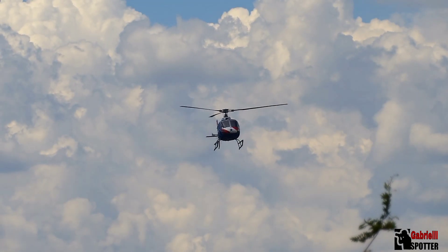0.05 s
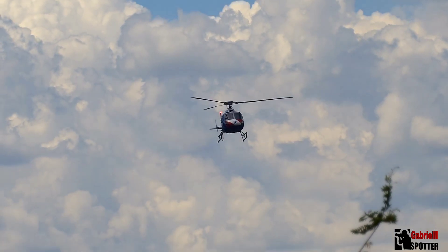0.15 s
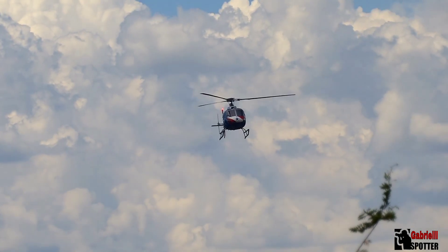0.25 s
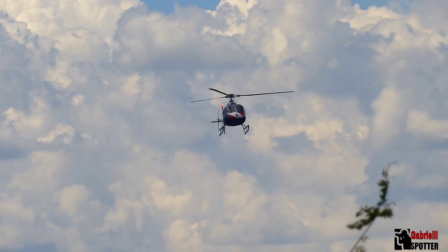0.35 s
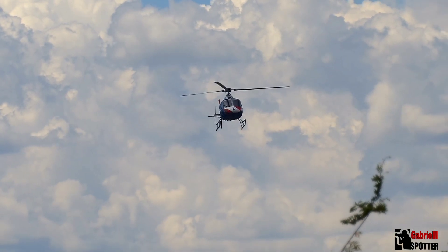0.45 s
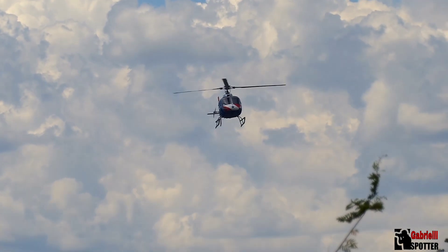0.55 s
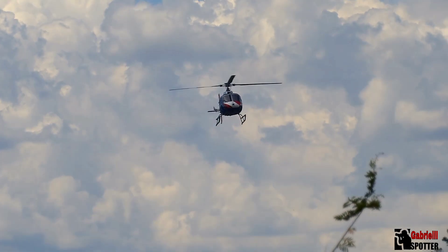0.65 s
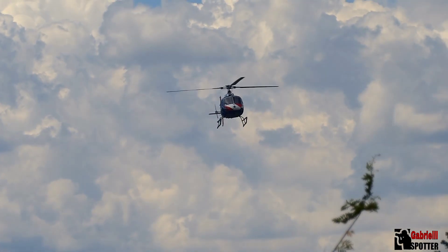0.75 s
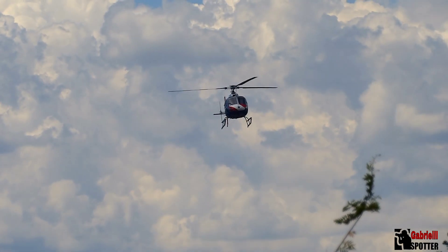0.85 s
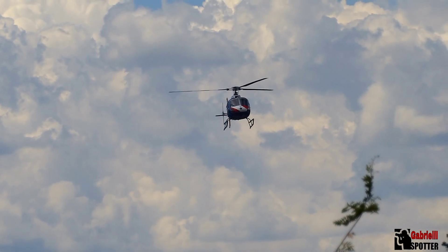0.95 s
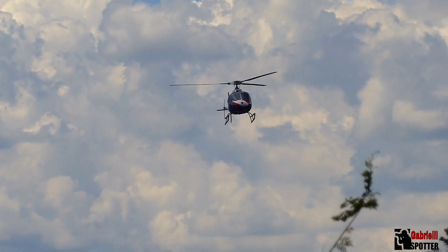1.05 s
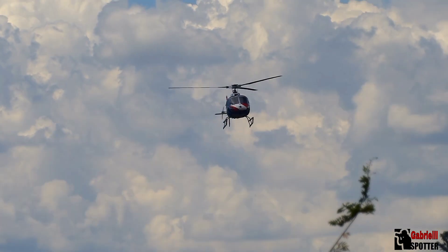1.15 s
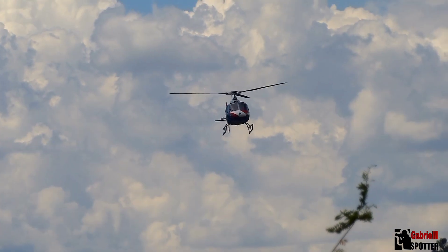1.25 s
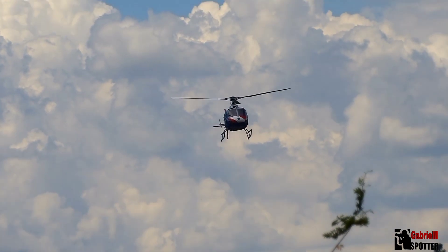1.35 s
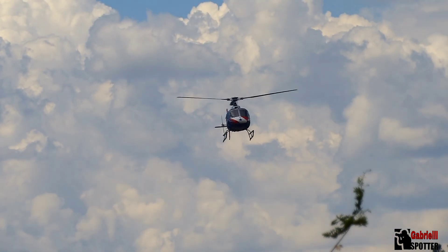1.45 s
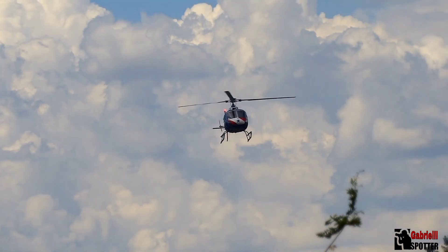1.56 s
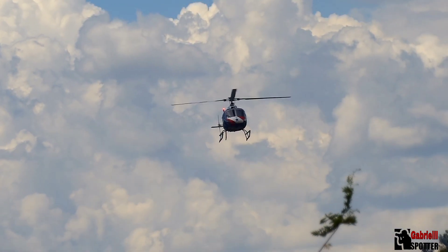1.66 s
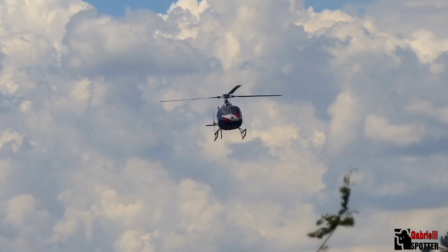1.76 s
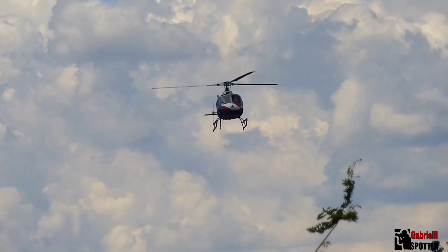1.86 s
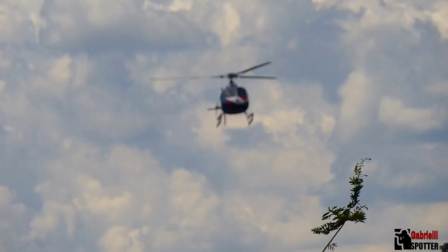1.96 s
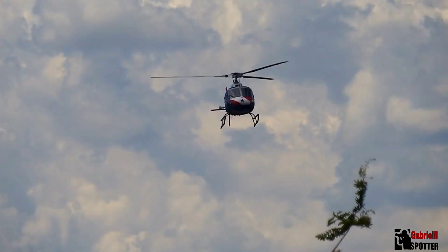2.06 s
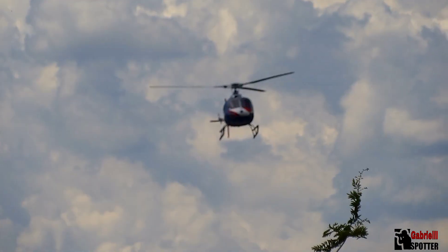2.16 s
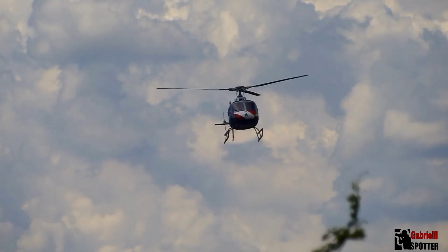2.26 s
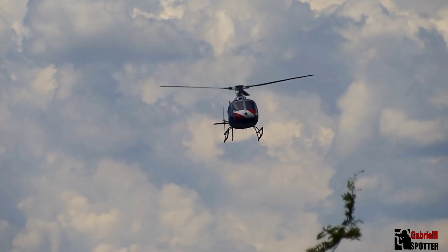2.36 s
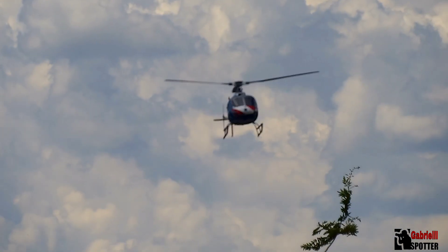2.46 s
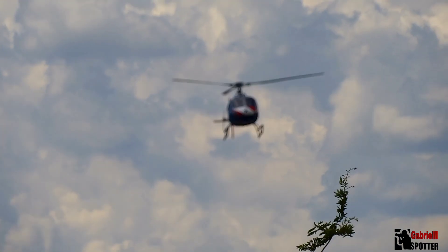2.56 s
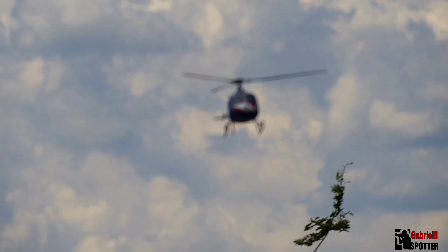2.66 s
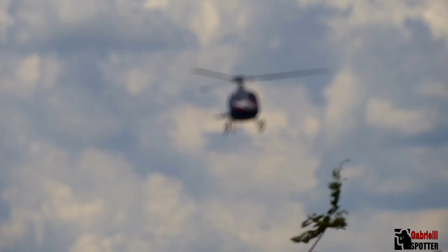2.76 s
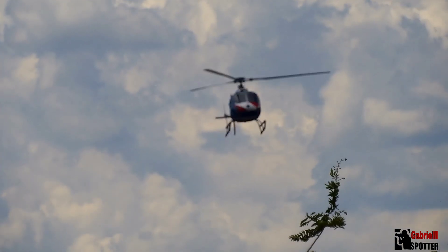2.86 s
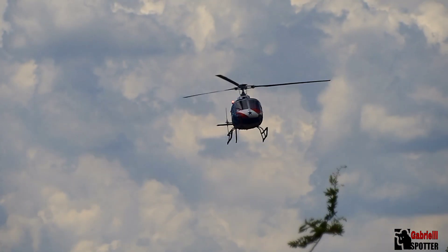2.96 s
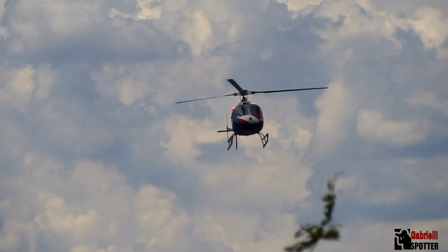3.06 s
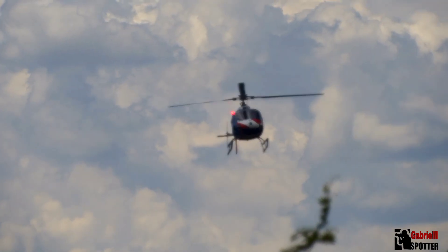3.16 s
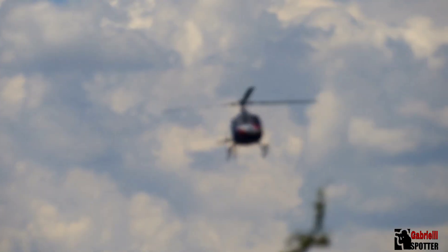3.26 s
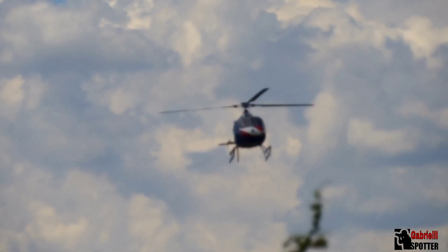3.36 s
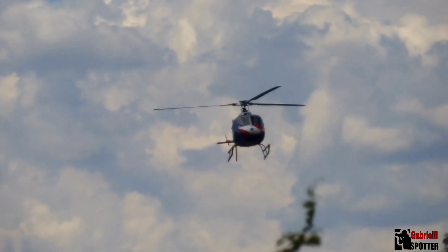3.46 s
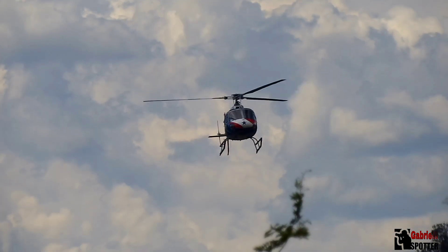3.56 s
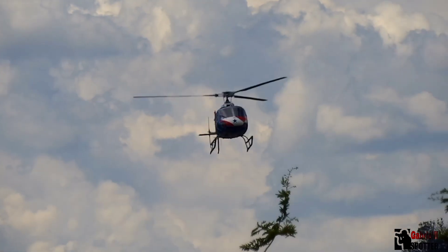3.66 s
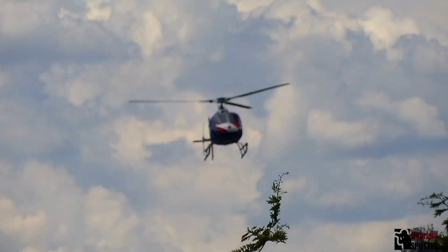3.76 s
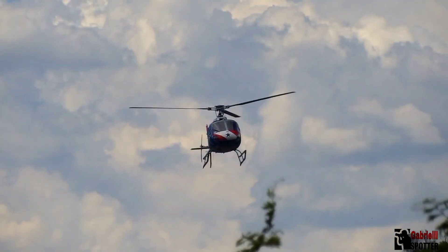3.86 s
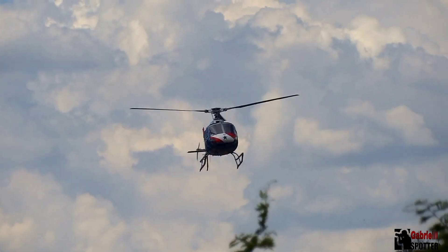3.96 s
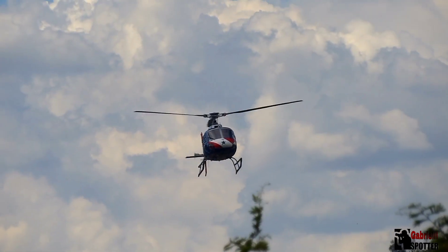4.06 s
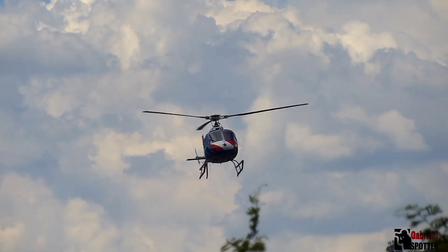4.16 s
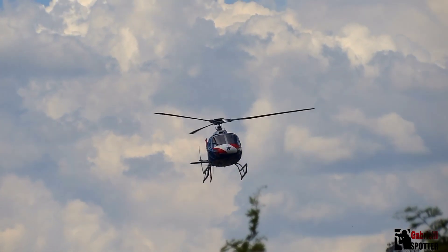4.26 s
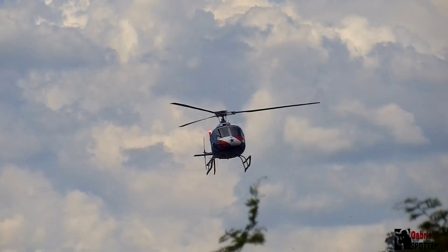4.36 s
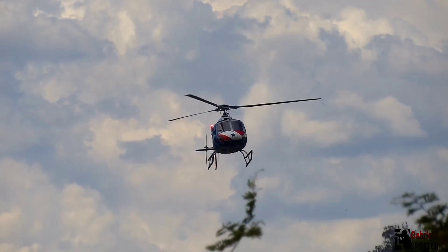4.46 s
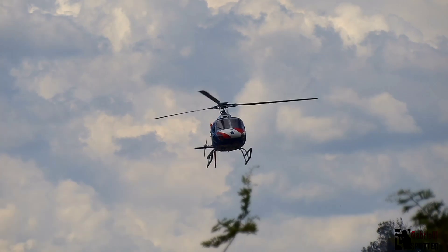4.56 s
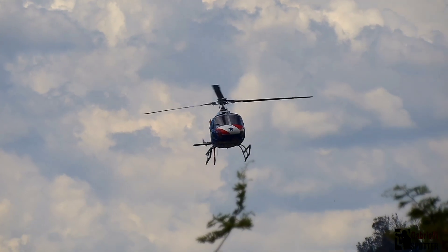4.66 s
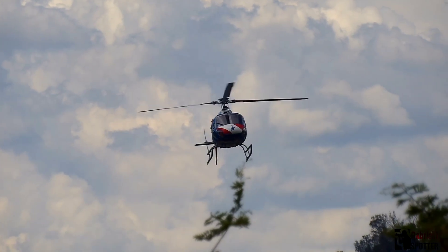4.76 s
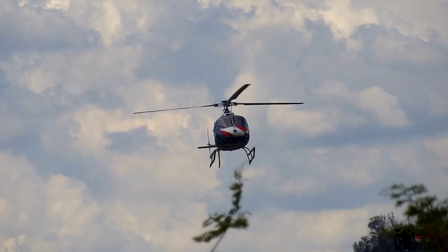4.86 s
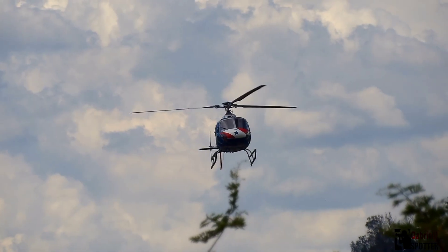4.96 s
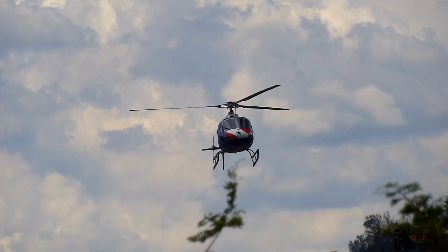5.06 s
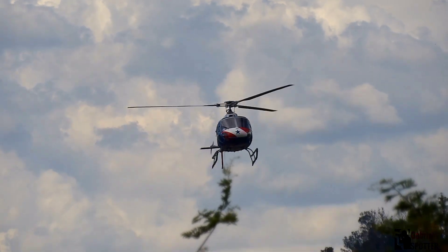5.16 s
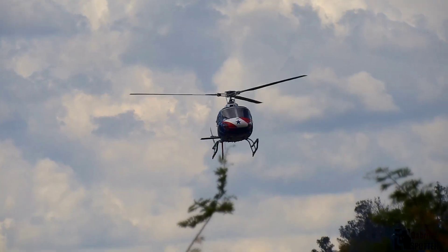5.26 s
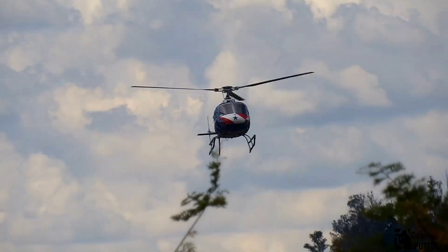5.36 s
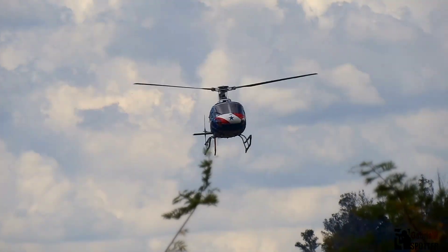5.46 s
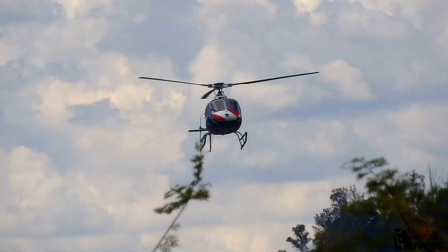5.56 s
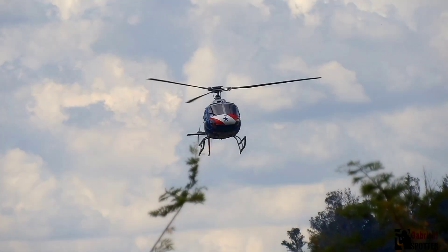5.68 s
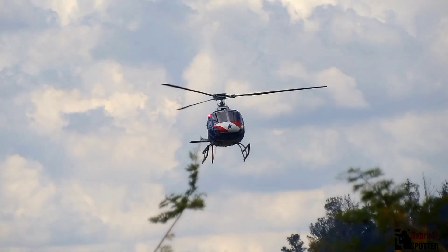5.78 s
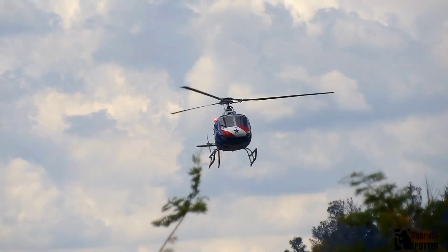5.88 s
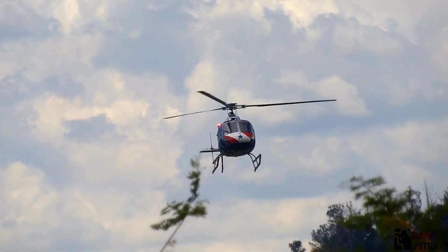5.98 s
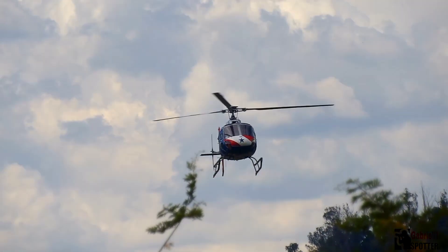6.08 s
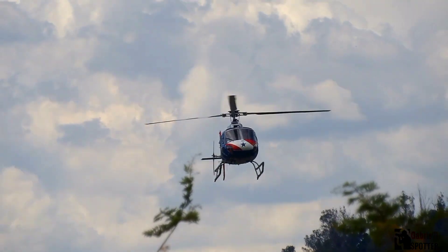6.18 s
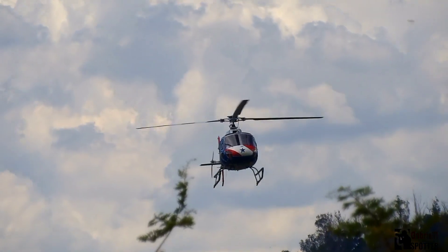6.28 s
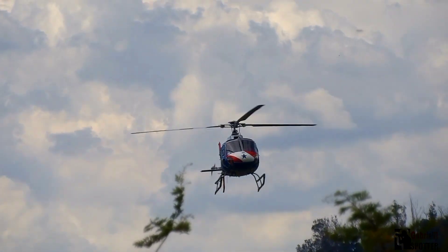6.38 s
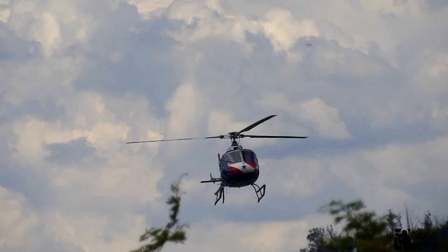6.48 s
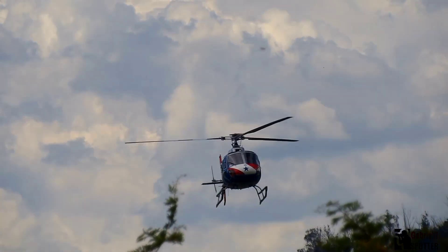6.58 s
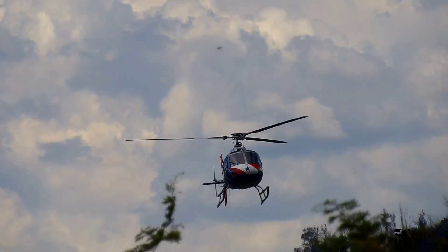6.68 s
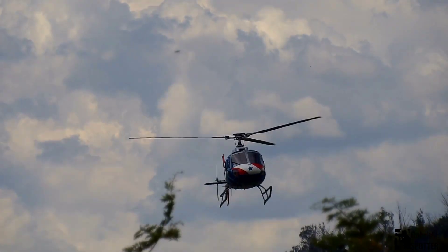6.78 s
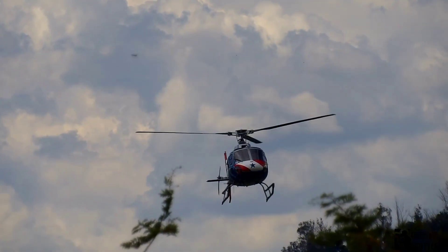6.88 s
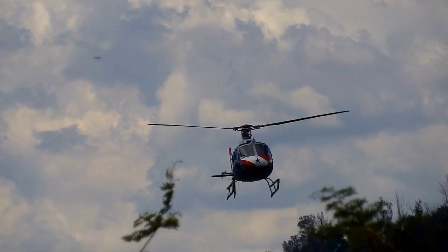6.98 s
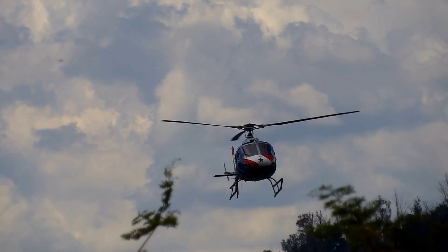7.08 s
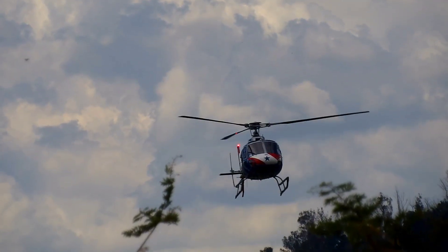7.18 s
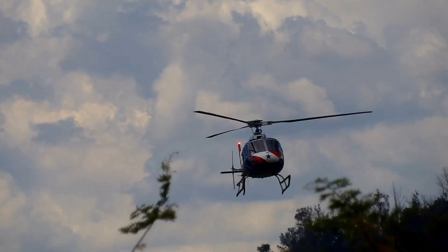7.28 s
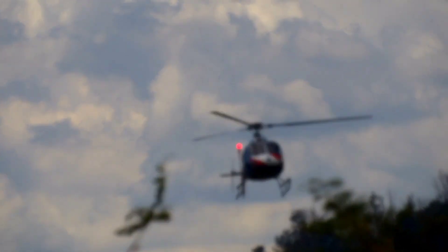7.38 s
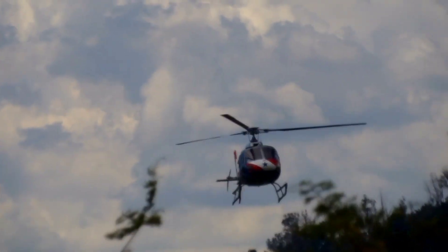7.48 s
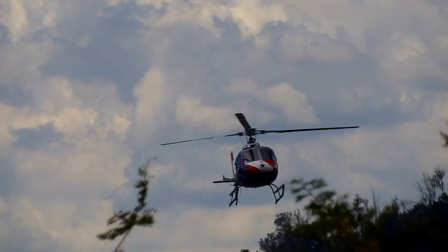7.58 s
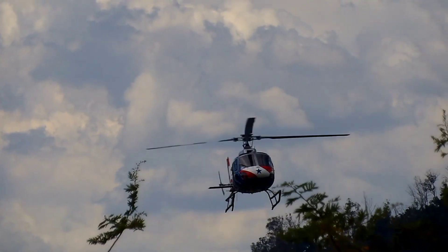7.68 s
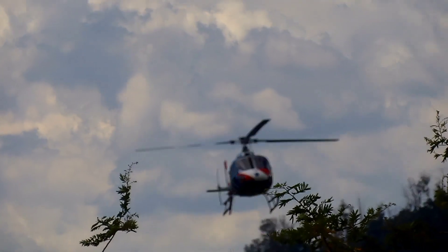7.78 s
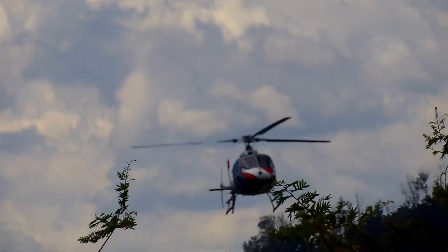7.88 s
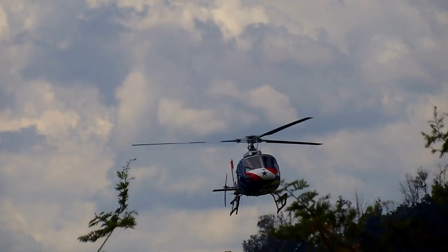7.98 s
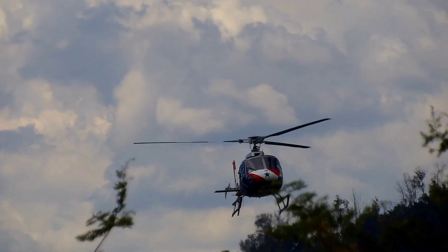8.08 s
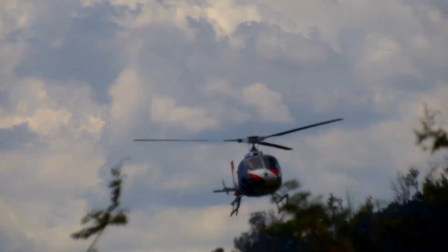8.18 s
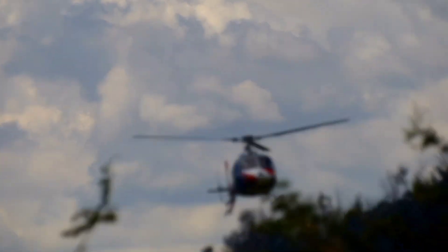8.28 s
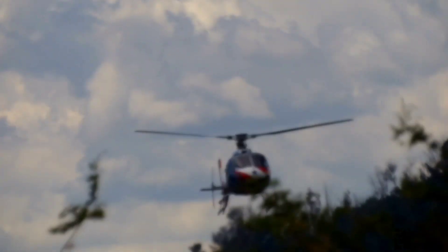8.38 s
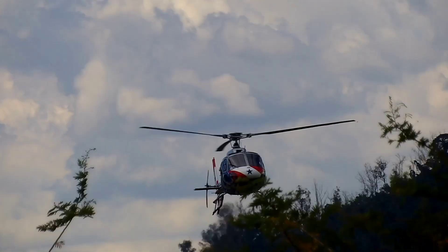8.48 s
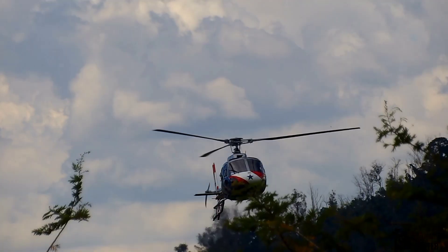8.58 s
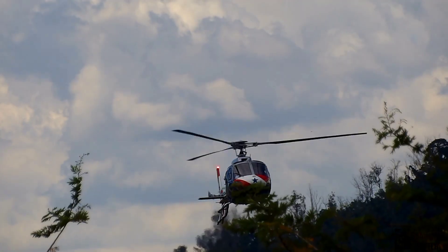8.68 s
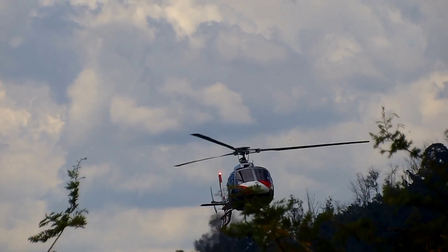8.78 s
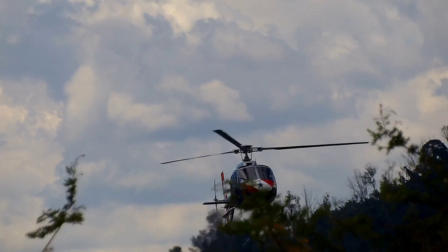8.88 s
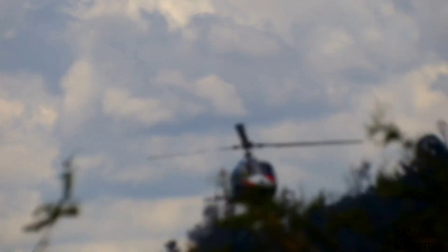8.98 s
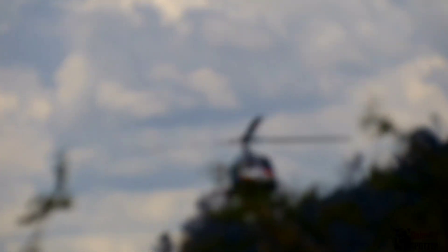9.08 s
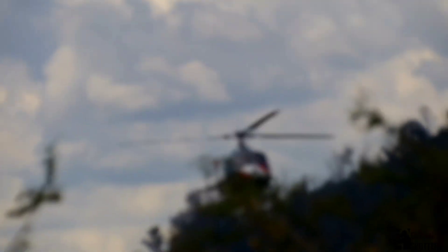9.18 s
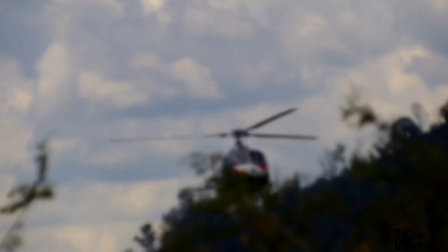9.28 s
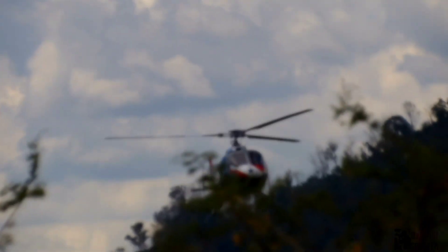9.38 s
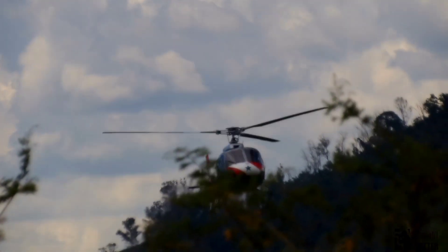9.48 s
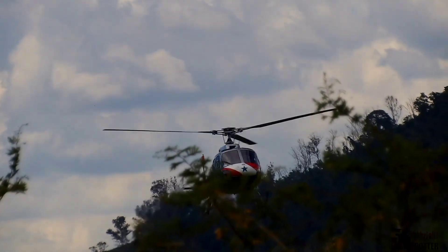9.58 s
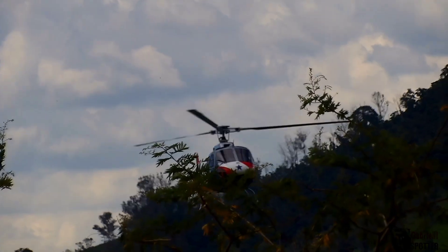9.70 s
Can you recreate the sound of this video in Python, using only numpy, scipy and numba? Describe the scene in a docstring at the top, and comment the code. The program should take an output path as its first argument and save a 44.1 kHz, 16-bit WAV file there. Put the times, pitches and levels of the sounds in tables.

```python
"""A light turbine helicopter flies toward the microphone over open country, from about 340 m to 240 m.
Each main blade slaps through the tip vortices of the blades ahead and swishes past; the tail rotor
drones and the exhaust roars. Gusts buffet the stereo microphone, the last one crackling and so hard
that everything else sinks. A few small clicks sound close by, over a faint microphone hiss."""
import sys
import numpy as np
from scipy import signal
from scipy.fft import rfft, irfft, next_fast_len
from scipy.io import wavfile
from scipy.ndimage import uniform_filter1d
from numba import njit

SR = 44100
rng = np.random.default_rng(int(sys.argv[2]) if len(sys.argv) > 2 else 0)


def to_wav(sig):
    """Store sig (one row per channel, or 1-D mono) as 16-bit WAV at the path in sys.argv[1].

    Samples outside -1..1 are clipped; the rate is SR.
    """
    pcm = np.clip(np.atleast_2d(sig), -1, 1) * 32767
    pcm = np.round(pcm).astype(np.int16)
    wavfile.write(sys.argv[1], SR, pcm.T)  # frames by channels


N = 429534
TIME = np.arange(N) / SR
TOP_HZ = 15800


def undb(db):
    """Decibels to gain."""
    return 10 ** (np.asarray(db) / 20)


def unit(x):
    """Scale to rms 1."""
    return x / np.sqrt(np.mean(x ** 2))


def curves(table):
    """The columns of a table, joined by straight lines in time."""
    times, *columns = np.transpose(table)
    return [np.interp(TIME, times, column) for column in columns]


def pan(db):
    """Left and right gains for a level difference, left minus right."""
    return undb(np.array([[.5], [-.5]]) * db)


def late(x, ms):
    """A copy delayed by so many milliseconds."""
    return np.interp(TIME - ms / 1000, TIME, x)


def swell(start, length, attack_s, release_s):
    """Envelope that rises, holds at 1 for its length and dies away."""
    before, after = np.maximum(start - TIME, 0), np.maximum(TIME - start - length, 0)
    return np.exp(-before / attack_s - after / release_s)


def walk(per_s):
    """Smooth random wandering of rms 1."""
    hold = int(SR / per_s)
    steps = np.repeat(rng.standard_normal(N // hold + 1), hold)
    return unit(uniform_filter1d(uniform_filter1d(steps, hold), hold)[:N])


def band(x, low_hz, high_hz):
    """Band-pass whose neighbours add up to one."""
    size = next_fast_len(N + SR // 10)
    hz = np.arange(size // 2 + 1) * SR / size
    gain = 1 / (1 + (hz / high_hz) ** 8) - 1 / (1 + (hz / low_hz) ** 8)
    return irfft(rfft(x, size) * gain, size)[..., :N]


def colour(x, points, size=4096):
    """Causal filter through (frequency [Hz], gain [dB]) points, built from the cepstrum."""
    hz, db = np.transpose(points)
    bin_hz = np.arange(size // 2 + 1) * SR / size + 1
    gain = undb(np.interp(np.log(bin_hz), np.log(hz), db))
    cepstrum = irfft(np.log(gain))[:size // 2]
    cepstrum[0] /= 2
    impulse = irfft(np.exp(rfft(2 * cepstrum, size)))
    return signal.fftconvolve(x, impulse)[:N]


def noise(points):
    """Coloured noise of rms 1."""
    return unit(colour(rng.standard_normal(N), points))


@njit
def resonance(x, hz, width_hz):
    """Band-pass whose centre may move from sample to sample."""
    out, band_state, low_state = np.empty(len(x)), 0., 0.
    for i in range(len(x)):
        tuning, damping = np.tan(np.pi * hz[i] / SR), width_hz / hz[i]
        passed = (band_state + tuning * (x[i] - low_state)) / (1 + tuning * (tuning + damping))
        band_state = 2 * passed - band_state
        low_state += 2 * tuning * passed
        out[i] = damping * passed
    return out


# the microphone's noise floor: (frequency [Hz], gain [dB])
HISS_SPECTRUM = [(1000, 14.5), (6000, 2), (8000, -3), (9800, -0.5), (11200, 2), (12600, -4.5),
                 (16000, -2.5)]

def microphone_hiss(level_db=-57.0):
    """Steady hiss, separate on each side; part of its treble dips once, briefly."""
    hiss = undb(level_db) * np.array([noise(HISS_SPECTRUM), noise(HISS_SPECTRUM)])
    dip = swell(start=1.77, length=.18, attack_s=.01, release_s=.01)
    return hiss - band(hiss, 6300, 10500) * dip


# clicks close to the microphone: (time [s], peak level [dB], ring [Hz])
NEAR_CLICKS = [(1.2377, -29.5, 5600), (1.511, -27.5, 4530), (1.5216, -36, 4700), (1.636, -35.5, 4800),
               (1.734, -35.5, 11000), (1.9988, -26, 5840), (2.0135, -36, 5000)]

def clicks(decay_s=0.0028, body_db=-1, body_hz=2600, top_ratio=0.6):
    """Tiny dry snaps, each a burst with a broad ring over a lower body."""
    out, t = np.zeros((2, N)), TIME[:SR // 30]
    for start, db, ring_hz in NEAR_CLICKS:
        burst = rng.standard_normal((2, len(t))) * np.exp(-t / decay_s)
        burst = burst + burst[0]  # partly shared by both sides
        ring = signal.lfilter(*signal.iirpeak(ring_hz, Q=3, fs=SR), burst)
        body = signal.lfilter(*signal.iirpeak(body_hz, Q=3, fs=SR), burst)
        lowpass = signal.butter(2, top_ratio * ring_hz, fs=SR)
        snap = signal.lfilter(*lowpass, ring + undb(body_db) * body)
        at = int(start * SR)
        out[:, at:at + len(t)] += undb(db) * snap / np.abs(snap).max()
    return out


# gusts reaching the microphone: (time [s], length [s], level [dB], left minus right [dB])
MIC_GUSTS = [(0.408, 0.0096, -32, -8), (0.71, 0.2, -35, 16), (0.925, 0.32, -27, 2.5),
             (1.32, 0.12, -34.5, 9), (2.082, 0.062, -29.5, 6), (2.253, 0.34, -28, 7),
             (2.738, 0.072, -36, 16), (3.937, 0.077, -38.5, 11), (4.06, 0.089, -30, 17.5),
             (4.72, 0.07, -36, 6), (5.032, 0.022, -29.5, 12), (5.337, 0.093, -30, 10),
             (5.5, 0.14, -32.5, -2.5), (5.967, 0.12, -35.5, 12), (6.162, 0.19, -31.5, 9),
             (7.775, 0.31, -39, 18), (8.244, 0.46, -31.5, 11), (8.657, 0.2, -29.5, 5.5),
             (8.925, 0.24, -30.5, 14), (9.154, 0.06, -26.5, 15), (9.252, 0.49, -22.5, 3.5)]

def airflow(breeze_db=-44.5, swing_db=4.5, breeze_side_db=3.5, eddy_db=2, eddies_per_s=22):
    """Gusts add in power to a breeze and lurch with eddies; gives level and left minus right in dB."""
    power = undb(breeze_db + swing_db * np.tanh(walk(5.6))) ** 2
    lean = power * breeze_side_db
    for start, length, db, side_db in MIC_GUSTS:
        gust = (undb(db) * swell(start, length, attack_s=0.06, release_s=0.11)) ** 2
        power, lean = power + gust, lean + gust * side_db
    return 10 * np.log10(power) + eddy_db * np.tanh(walk(eddies_per_s)), lean / power


# one pop on a microphone port: (frequency [Hz], gain [dB])
CRACKLE_SPECTRUM = [(100, -20), (300, 6), (900, 2.5), (1400, -9), (4000, -43), (8000, -74.5)]

def crackle(per_s=160, scatter_db=4):
    """Small eddies pop on a port at random moments; rms 1."""
    count = int(per_s * N / SR)
    when, size = rng.random((count, 2)).T
    polarity = (-1) ** np.arange(count)
    pops = np.zeros(N)
    pops[(when * N).astype(int)] = undb(-scatter_db * np.log(size + .03)) * polarity
    return unit(colour(pops, CRACKLE_SPECTRUM))


# rumble of a buffet: (frequency [Hz], gain [dB])
BUFFET_SPECTRUM = [(40, -30.5), (110, -8), (230, 4.5), (480, -1.5), (900, -4), (1500, -10), (4000, -31)]
# hard hits on the microphone: (time [s], level [dB], half-width [s], left minus right [dB], top [Hz])
MIC_BUFFETS = [(0.908, -20, 0.0059, -6, 420), (1.006, -19, 0.0045, -6, 380), (1.125, -22.5, 0.01, 6, 400),
               (2.098, -20, 0.0049, 11, 447), (2.267, -21, 0.0034, -15, 495), (2.308, -24, 0.0043, -3, 496),
               (2.451, -22, 0.016, 6, 544), (4.101, -23.5, 0.0067, 4, 550), (4.177, -24.5, 0.0059, 13, 547),
               (5.068, -23, 0.0067, 19.5, 610), (5.362, -17, 0.0049, 12, 547),
               (7.719, -21, 0.0036, 19, 616), (8.381, -23.5, 0.0059, 13, 500),
               (8.605, -20, 0.0052, -3, 450), (8.645, -23.5, 0.011, 5, 453), (8.733, -19, 0.0045, 13, 497),
               (8.822, -23, 0.0088, 20, 573), (9.118, -11.5, 0.0062, 14, 530), (9.13, -15, 0.0031, 15, 900),
               (9.245, -17.5, 0.0037, 1.5, 1100), (9.266, -10.5, 0.0023, 6, 900),
               (9.37, -18, 0.0051, 16.5, 1600), (9.397, -18.5, 0.0018, 7.5, 1700),
               (9.435, -19, 0.0059, 8.5, 1500), (9.497, -14.5, 0.0027, 4.5, 1400),
               (9.539, -18.5, 0.0044, -8.5, 1470), (9.665, -18.5, 0.0033, 1, 1500)]

def buffets():
    """Big eddies hit the ports: short bursts of rumble, each with its own brightness."""
    air, out = np.array([noise(BUFFET_SPECTRUM), noise(BUFFET_SPECTRUM)]), np.zeros((2, N))
    t = TIME[:SR // 10] - TIME[SR // 20]
    for centre, db, width, side_db, top_hz in MIC_BUFFETS:
        at = int((centre + t[0]) * SR) + np.arange(len(t))
        bell = np.exp(-.5 * (t / width) ** 2)
        burst = bell * signal.lfilter(*signal.butter(3, top_hz, fs=SR), air[:, at])
        burst *= np.linalg.norm(bell) / np.linalg.norm(burst, axis=1, keepdims=True)
        out[:, at] += undb(db) * pan(side_db) * burst
    return out


# wind on the microphone, low rumble and midrange flutter: (frequency [Hz], gain [dB])
RUMBLE_SPECTRUM = [(20, -45), (42, -27), (80, -4), (150, 2), (240, -5.5), (500, -14.5), (700, -41),
                   (1000, -51), (5000, -75.5)]
FLUTTER_SPECTRUM = [(60, -38), (130, -9), (220, 10.5), (330, 7), (460, 13.5), (850, -4.5), (1400, -21),
                    (4000, -52), (8000, -72)]

def wind(duck_db, strong_db=-20.0, flutter_db=-4.0, crackle_db=-18):
    """Eddies rumble on each port separately; the harder the gust, the more it flutters and crackles."""
    level_db, side_db = airflow()
    force_db = level_db - duck_db - strong_db
    flutter_gain = undb(flutter_db + force_db)
    crackle_gain = undb(np.minimum(crackle_db + force_db, -3))
    ports = []
    for _ in range(2):
        rumble = noise(RUMBLE_SPECTRUM) * unit(undb(2 * walk(45)))
        flutter = noise(FLUTTER_SPECTRUM) * unit(undb(3.5 * walk(170)))
        blend = (rumble + 0.98 * flutter_gain * flutter) / np.sqrt(1 + flutter_gain ** 2)
        ports.append(blend + crackle_gain * crackle())
    air = np.array(ports) * undb(level_db) * pan(side_db) + buffets()
    thinning = np.maximum(1 - undb(duck_db / 2), 0)  # the last gust loses deep rumble
    return air - band(air, 10, 125) * thinning


def tree_scatter(x, t60_s=0.13, wet_db=-23.5):
    """Diffuse, dull scatter from the trees and ground around, different on each side."""
    t = TIME[:SR // 2]
    tails = rng.standard_normal((2, len(t))) * np.exp(-np.log(1000) * t / t60_s)
    tails /= np.sqrt(np.sum(tails ** 2, axis=1, keepdims=True))
    return undb(wet_db) * signal.fftconvolve(band(x, 30, 1200)[None], tails, axes=1)[:, :N]


# the ground bounce reaches the microphone after the direct sound: (time [s], lag [ms])
BOUNCE_LAG = [(0, 1.77), (3.6, 1.61), (9.74, 1.65)]

def ground_bounce(x, reflection=.6):
    """Add the late copy off the ground: a comb whose teeth slide as the helicopter moves."""
    return x + reflection * late(x, curves(BOUNCE_LAG)[0])


def approach(start_m=344, closing_m_s=10.95):
    """Gain rising as one over the distance; helicopter levels hold at the starting distance."""
    return start_m / (start_m - closing_m_s * TIME)


# the exhaust from far across the field: (frequency [Hz], gain [dB])
EXHAUST_SPECTRUM = [(25, -32.5), (70, 11.5), (150, 10.5), (250, 15), (520, 7.5), (780, 3.5), (950, -3),
                    (1220, 1.5), (1520, -3.5), (1850, 0.5), (2450, -6.5), (2900, -13), (4200, -20.5),
                    (6000, -32), (9000, -49)]
# its roar at the starting distance: (time [s], level [dB])
EXHAUST_LEVEL = [(0, -44.5), (1.5, -44.5), (2.7, -46.5), (4.1, -46), (5.0, -40), (6.2, -40.5), (8.4, -39.5),
                 (9.0, -35), (9.74, -46)]

def exhaust():
    """Broad turbine roar; its lows and highs waver separately."""
    roar = noise(EXHAUST_SPECTRUM)
    low = band(roar, 10, 1230) * undb(1.2 * walk(7))
    high = band(roar, 670, 15000) * undb(1.4 * walk(9))
    return (low + high) * undb(curves(EXHAUST_LEVEL)[0])


# tail rasp at the starting distance: (time [s], level [dB])
RASP_LEVEL = [(0, -61), (1.4, -59), (2.2, -73), (5.9, -69), (6.6, -57), (7.8, -67)]

def tail_rasp(tail_phase, sharpness=1.4, lead_rad=0.42):
    """Each tail blade throws a short spit of hiss, a fine buzz between the main beats."""
    gate = np.exp(sharpness * np.cos(2 * np.pi * tail_phase + lead_rad))
    spits = band(rng.standard_normal(N), 2400, 4700) * gate
    return unit(spits) * undb(curves(RASP_LEVEL)[0] + 2 * walk(10))


# partials of the tail rotor: (multiple of its blade rate, relative level [dB])
TAIL_PARTIALS = [(1, -12), (2, -1.8), (3, 2), (4, -1.5), (6, -3.5), (7, -12), (8, -11.5), (11, -14)]
# its drone at the starting distance: (time [s], level [dB])
DRONE_LEVEL = [(0, -36.5), (1.2, -37.5), (4.5, -38.5), (9.74, -43)]

def tail_drone(tail_phase):
    """The tail rotor's harmonic drone; turbulent air makes each partial fade and return."""
    angle = 2 * np.pi * tail_phase + 0.12 * walk(4.5)
    drone = np.zeros(N)
    for order, db in TAIL_PARTIALS:
        drone += undb(db + 1.32 * walk(4)) * np.sin(order * angle + rng.uniform(0, 2 * np.pi))
    return unit(drone) * undb(curves(DRONE_LEVEL)[0])


# main rotor at the microphone, its Doppler shift easing: (time [s], blade passages [1/s])
PASSAGE_RATE = [(0, 20.7117), (1.5, 20.6727), (3, 20.6101), (4.5, 20.5492), (6, 20.4034), (7.5, 20.3208),
                (9, 20.1969), (9.74, 20.2848)]

def rotor_phase(start=-.3212):
    """Running count of main blade passages, a whole number at each one."""
    return start + np.cumsum(curves(PASSAGE_RATE)[0]) / SR


# broad swish of the blade span: (frequency [Hz], gain [dB])
SWISH_SPECTRUM = [(300, 17), (700, 14.5), (1250, 21.5), (1550, 9), (2300, 7.5), (2900, 1.5), (4300, -2),
                  (5000, -21.5), (6300, -16.5), (8000, -28), (12000, -53.5)]
# that swish at the starting distance: (time [s], level [dB])
SWISH_LEVEL = [(0, -49.5), (1.2, -56), (3.0, -46.5), (3.75, -43.5), (4.15, -47.5), (4.7, -43.5),
               (5.2, -41.5), (6.7, -43), (8.5, -41), (9.0, -37), (9.74, -41.5)]
# tip hiss, sliding as the angle to the rotor changes: (time [s], centre [Hz], level [dB])
TIP_BAND = [(0, 3980, -65), (1.1, 4300, -92), (3.0, 4300, -84), (3.75, 4230, -59), (4.1, 4140, -71),
            (4.7, 4220, -60.5), (5.2, 4560, -66.5), (5.6, 5430, -69), (5.85, 4400, -58), (6.1, 3400, -56.5),
            (6.8, 4000, -74), (7.4, 4260, -58.5), (8.4, 4170, -75), (9.0, 4060, -58)]

def blade_swish(phase, rise_cycles=0.066, fall_cycles=0.15, lead_cycles=0.042, tip_lag_ms=2.7):
    """Turbulence hisses off each advancing blade, broad from the span and narrow from the tip."""
    cycle = (phase + lead_cycles) % 1
    gate = (1 - np.exp(-(cycle / rise_cycles) ** 2)) * np.exp(-cycle / fall_cycles)
    tip_hz, tip_db = curves(TIP_BAND)
    tip = rng.standard_normal(N)
    for _ in range(3):
        tip = resonance(tip, tip_hz, width_hz=1770.0)
    span = unit(noise(SWISH_SPECTRUM) * gate) * undb(curves(SWISH_LEVEL)[0] + 0.2 * walk(14))
    return span + unit(tip * late(gate, tip_lag_ms)) * undb(tip_db)


# tip vortices met in turn, older ones wider and duller: (delay [ms], level [dB], top [Hz])
TIP_VORTICES = [(0, -2, 8800), (2.25, -1.5, 1130), (3.949, 1, 950)]
# where the blades cut the wake: (time [s], delay [ms], focus [factor], spacing [factor])
# focus scales the vortex levels in dB (0 = all alike); spacing scales the vortex delays
WAKE_PATH = [(0, 1.5, 0.086, 1), (1.6, 1.5, 0.28, 0.98), (2.3, 2, 3.34, 0.87), (3.2, 3, 0.44, 0.93),
             (3.8, 2, 1.1, 0.98), (4.5, 0.2, 0.27, 0.96), (6.1, -0.07, 0.66, 1), (6.6, 0, 1.51, 0.95),
             (9.74, 0, 0.6, 1)]

def vortex_strikes(phase, scatter_db=1.3, jitter_ms=.1):
    """Each blade strikes a row of vortices, one pulse from each, never quite the same twice."""
    passages = np.interp(np.arange(int(phase[-1]) + 1), phase, TIME)
    shift_ms, focus, spacing = (np.interp(passages, TIME, c) for c in curves(WAKE_PATH))
    pulses = np.zeros(N)
    for delay_ms, db, top_hz in TIP_VORTICES:
        size, jitter = rng.standard_normal((len(passages), 2)).T
        at = (passages + (shift_ms + delay_ms * spacing + jitter_ms * jitter) / 1000) * SR
        strikes = np.zeros(N)
        strikes[np.clip(at, 0, N - 1).astype(int)] = undb(db * focus + scatter_db * size)
        pulses += band(strikes, 12, top_hz)
    return pulses


# low thump under the slap, at the starting distance: (time [s], level [dB])
THUMP_LEVEL = [(0, -34.5), (1.4, -36.5), (2.0, -33), (4.1, -30.5), (4.5, -40.5), (6.2, -39.5), (6.5, -32),
               (8.0, -28.5), (9.0, -32), (9.74, -28)]
# the thump deepens on the way in: (time [s], centre [Hz])
THUMP_CENTRE = [(0, 280), (3.6, 323), (5.3, 236), (7.2, 239), (8.6, 230)]

def blade_thump(phase, delay_ms=1.175, width_ms=1.95):
    """Each blade shoves the air aside: one short, low suction pulse."""
    from_passage_ms = 1000 * ((phase + .5) % 1 - .5) / curves(PASSAGE_RATE)[0]
    ms = from_passage_ms - curves(WAKE_PATH)[0] / 2 - delay_ms
    bell = np.exp(-.5 * (ms / width_ms) ** 2)
    pulse = -bell * np.cos(2 * np.pi * curves(THUMP_CENTRE)[0] * ms / 1000)
    return unit(band(pulse, 175, 440)) * undb(curves(THUMP_LEVEL)[0] + walk(19))


# spells in which the blades cut a vortex core: (time [s], length [s], extra crack [dB])
CORE_CUTS = [(1.495, 0.048, 13.5), (1.85, 0.9, 8), (2.506, 0.2, 7), (3.307, 0.13, 7), (3.56, 0.31, 5.5),
             (6.55, 0.55, 3), (7.2, 0.33, 11), (7.65, 1, 5), (8.97, 0.42, 21.5)]

def blade_crack(strikes, slap_db, base_db=-49, reference_slap_db=-26.5, growth=1.13):
    """The sharp top of each strike; it outgrows the slap and flares when a vortex core is cut."""
    flare_db = sum(db * swell(start, length, attack_s=0.092, release_s=0.046)
                   for start, length, db in CORE_CUTS)
    crack_db = base_db + growth * (slap_db - reference_slap_db) + flare_db
    return unit(ground_bounce(band(strikes, 790, 12000))) * undb(crack_db + walk(15))


# one strike from far across the field: (frequency [Hz], gain [dB])
SLAP_SPECTRUM = [(115, -18.5), (300, 4.5), (480, 3), (610, -0.5), (800, -6), (950, -12), (1180, -1.5),
                 (1450, -22.5), (1800, -5.5), (2400, -8.5), (3100, -20.5), (4200, -34), (8000, -49)]
# slap at the starting distance, varying as the rotor sinks into its wake: (time [s], level [dB])
SLAP_LEVEL = [(0, -36.5), (0.3, -34.5), (0.6, -40), (1.35, -41), (1.85, -33), (2.15, -28.5), (2.65, -29.5),
              (2.9, -32.5), (3.4, -27), (4.15, -32), (4.42, -38), (5.0, -33), (6.25, -37), (6.55, -29),
              (7.4, -30.5), (8.15, -31.5), (9.05, -40), (9.74, -35)]
# knock near 800 Hz, where the vortices add up or cancel: (time [s], gain within the slap [dB])
KNOCK_GAIN = [(0.2, 4.5), (1.1, 3.5), (1.8, -6), (2.6, -12), (3.3, -1.5), (3.9, 4.5), (4.3, 0.5),
              (6.7, -7.5), (7.5, 0), (8.4, 6.5), (9.74, -9)]

def blade_slap(phase, echo_ms=5.097, echo_db=-16.5):
    """The vortex strikes as they reach the microphone: a midrange slap, its close echo and a crack."""
    strikes = colour(vortex_strikes(phase), SLAP_SPECTRUM)
    slap_db = curves(SLAP_LEVEL)[0]
    knock = band(strikes, 664, 925) * undb(curves(KNOCK_GAIN)[0])
    slap = unit(band(strikes, 280, 663) + knock) * undb(slap_db)
    return slap + undb(echo_db) * late(slap, echo_ms) + blade_crack(strikes, slap_db)


# everything but the wind sinks under the last gust: (time [s], gain [dB])
GUST_DUCKING = [(0, 0.5), (8.6, 0.5), (8.85, -2), (9.1, 2), (9.2, -11.5), (9.74, -14)]

def scene(tail_gearing=3.536):
    """Open country: the helicopter closing in almost dead ahead, clicks nearby, wind on the microphone."""
    phase = rotor_phase()
    tail_phase = tail_gearing * phase
    main_rotor = blade_thump(phase) + blade_slap(phase) + blade_swish(phase)
    tail_rotor = tail_drone(tail_phase) + tail_rasp(tail_phase)
    helicopter = approach() * (main_rotor + tail_rotor + exhaust())
    outdoors = helicopter * pan(-1.15) + tree_scatter(helicopter) + clicks()
    duck_db = curves(GUST_DUCKING)[0]
    return (outdoors + microphone_hiss()) * undb(duck_db) + wind(duck_db)


# two narrow hollows in the whole sound, near 370 and 970 Hz: (frequency [Hz], Q, depth [0-1])
TONE_HOLLOWS = [(370, 15.6, 0.61), (972, 8.3, 0.31)]

def record(dry, low_cut_hz=38, fade_s=.004):
    """The whole sound loses its deepest bass, has two hollows and clips at full scale; the top is cut."""
    x = signal.sosfilt(signal.butter(2, low_cut_hz, "high", fs=SR, output="sos"), dry)
    for hz, q, depth in TONE_HOLLOWS:
        x = x - depth * signal.lfilter(*signal.iirpeak(hz, q, fs=SR), x)
    fade_out = np.minimum((TIME[-1] - TIME) / fade_s, 1)
    top_cut = signal.ellip(10, .1, 80, TOP_HZ, fs=SR, output="sos")
    return signal.sosfilt(top_cut, np.clip(x, -1, 1) * fade_out)


dry = scene()
out = record(dry)
to_wav(out)
```